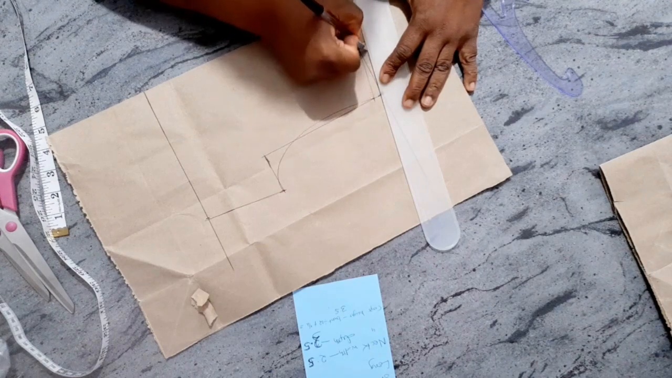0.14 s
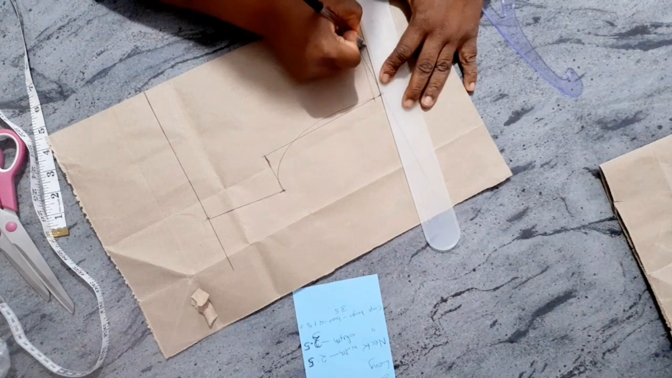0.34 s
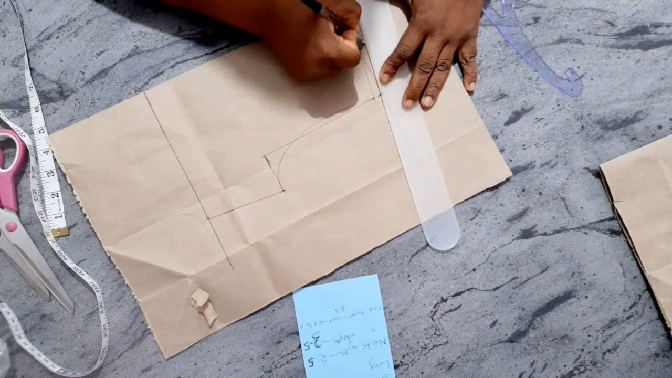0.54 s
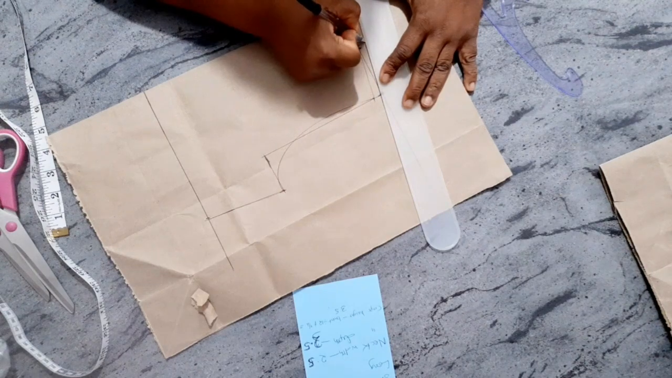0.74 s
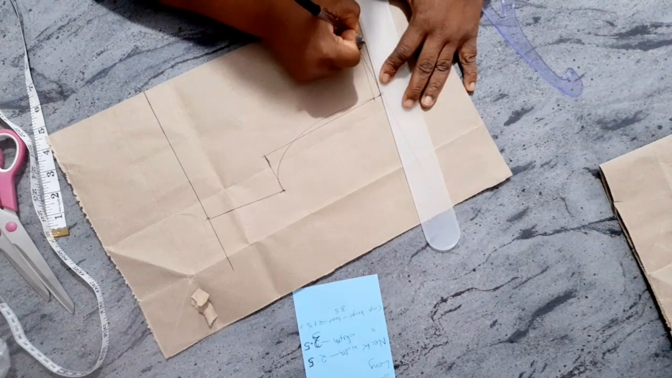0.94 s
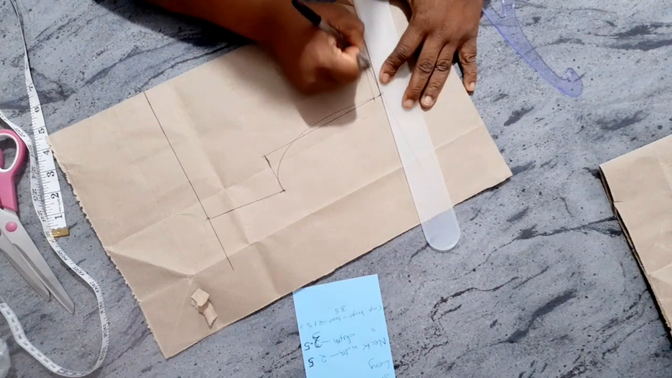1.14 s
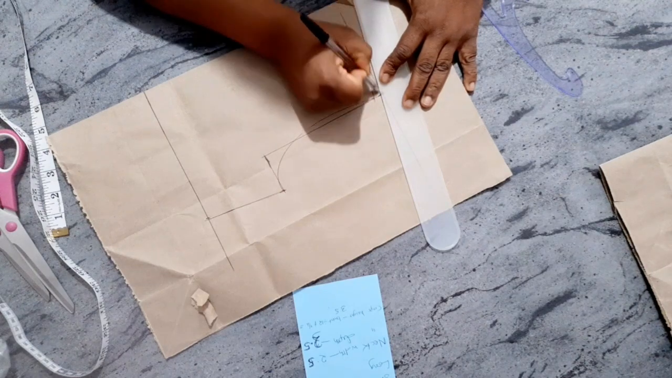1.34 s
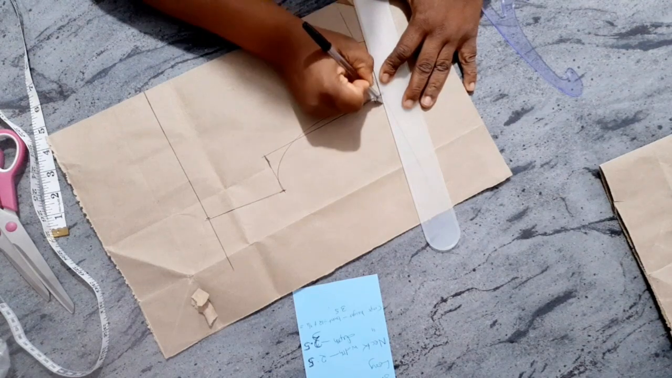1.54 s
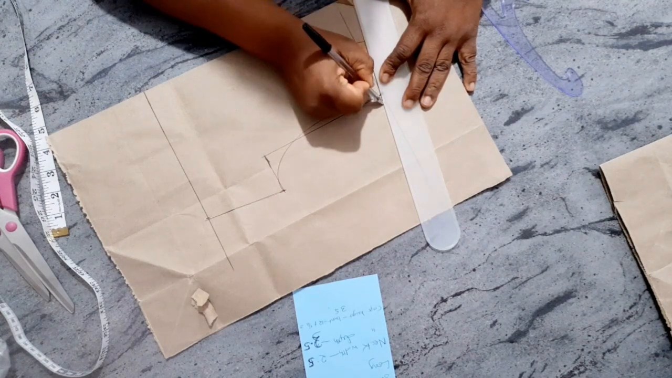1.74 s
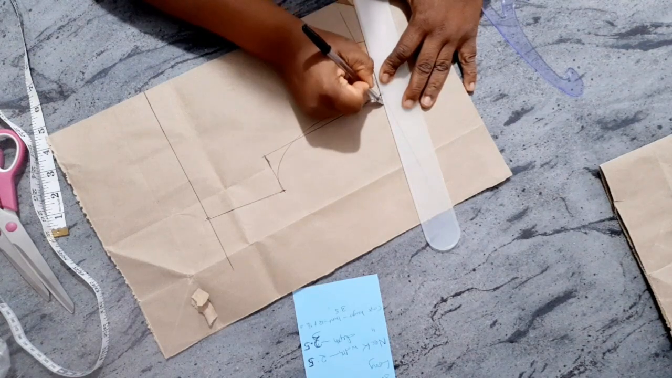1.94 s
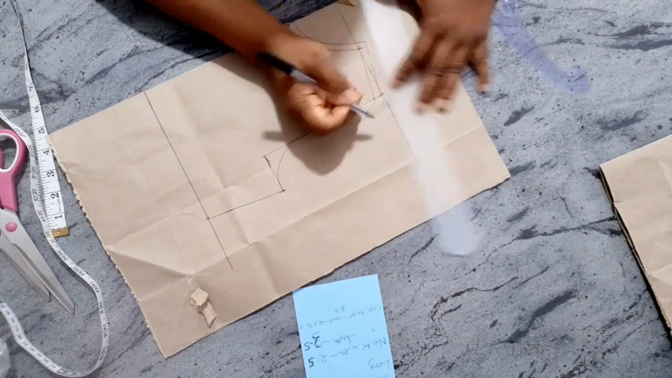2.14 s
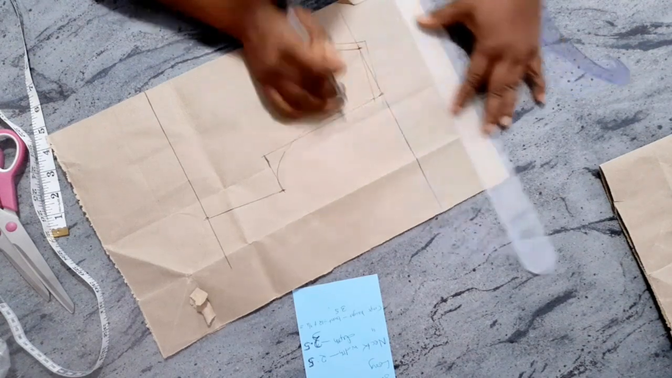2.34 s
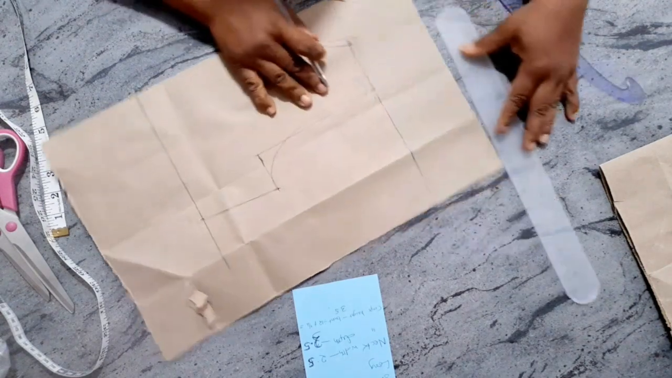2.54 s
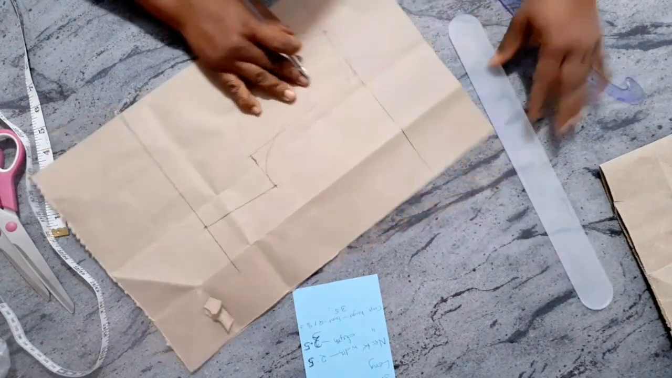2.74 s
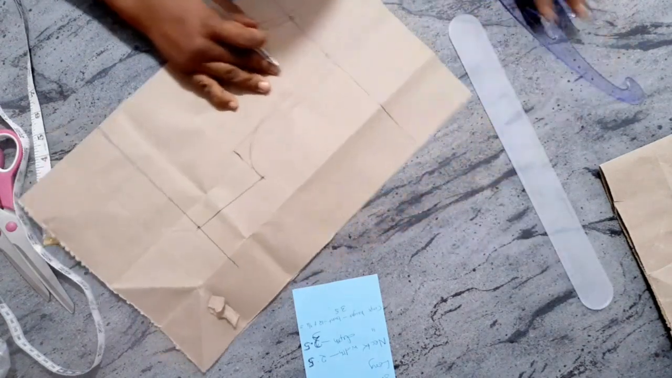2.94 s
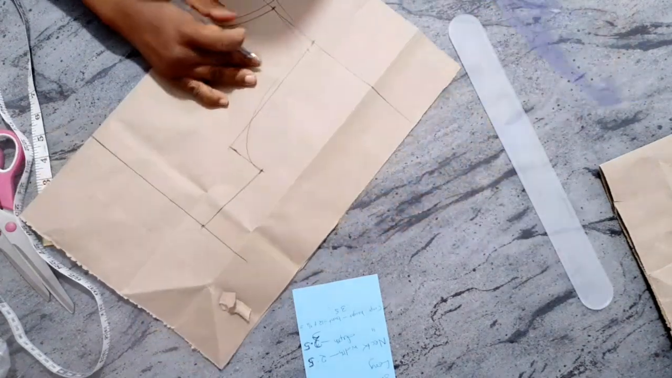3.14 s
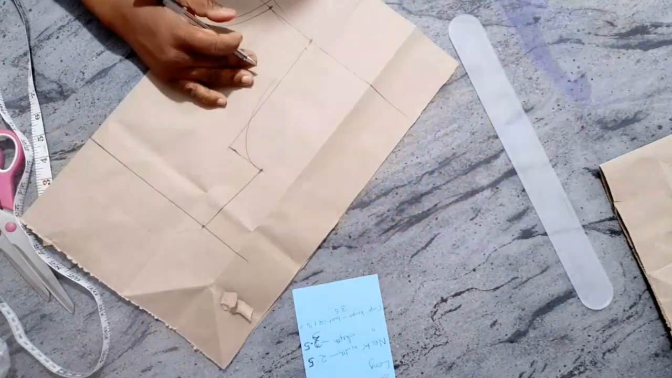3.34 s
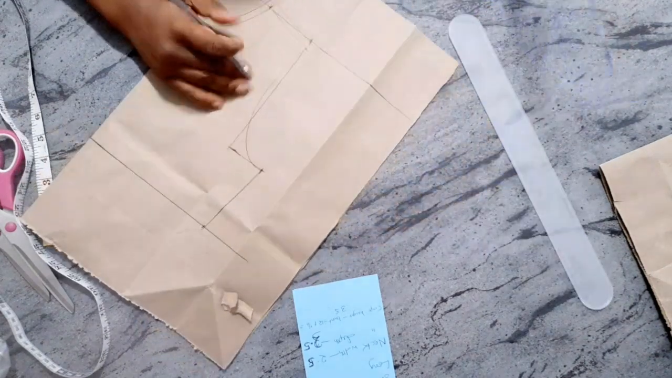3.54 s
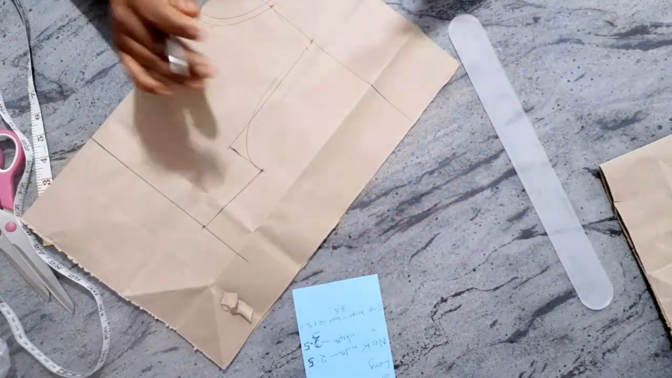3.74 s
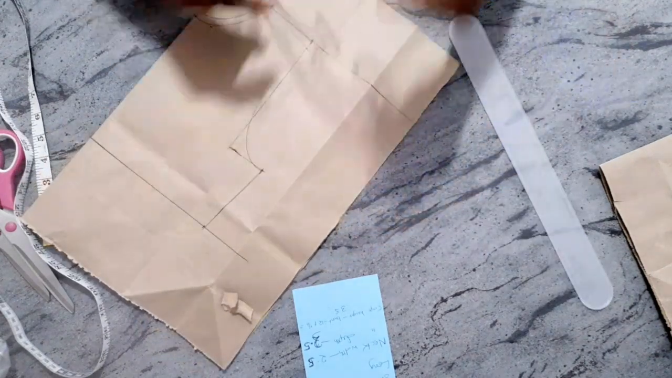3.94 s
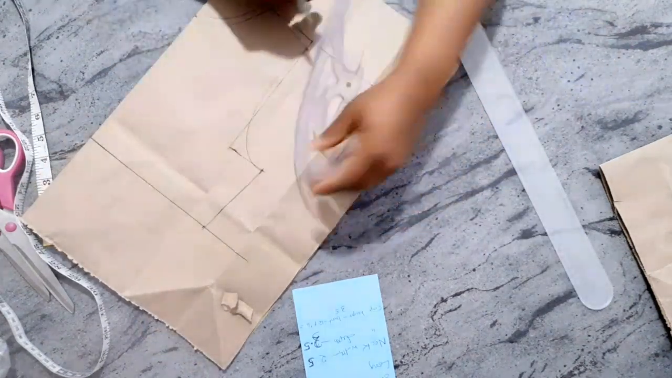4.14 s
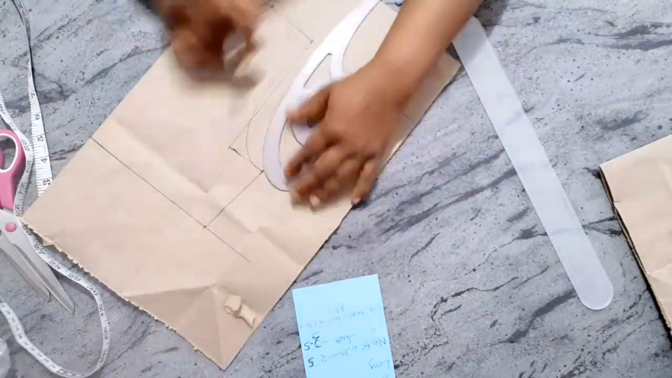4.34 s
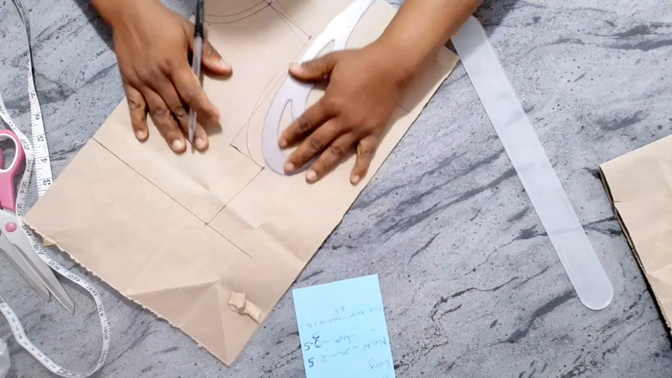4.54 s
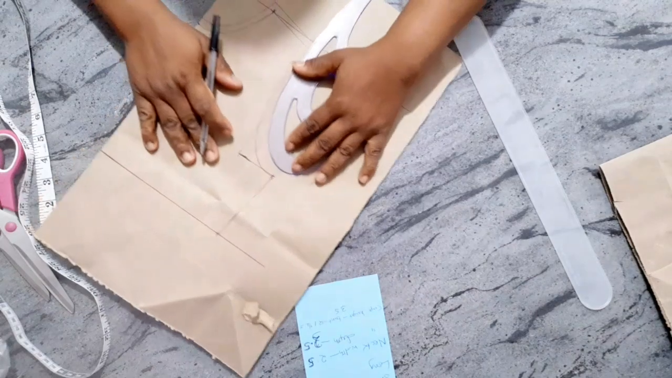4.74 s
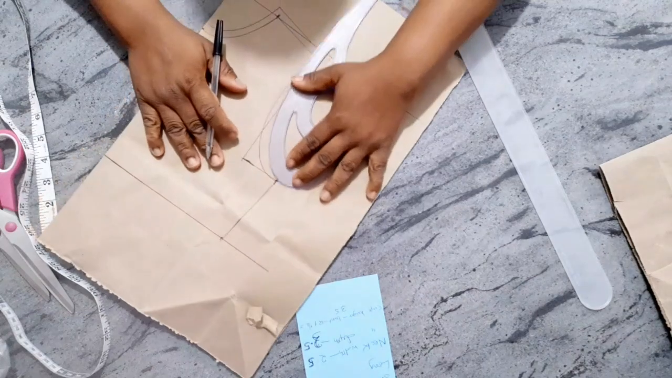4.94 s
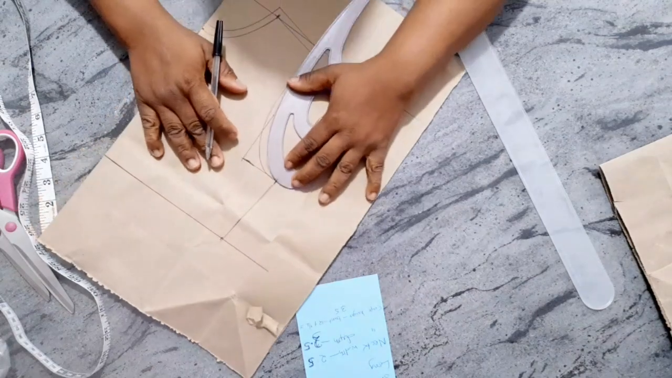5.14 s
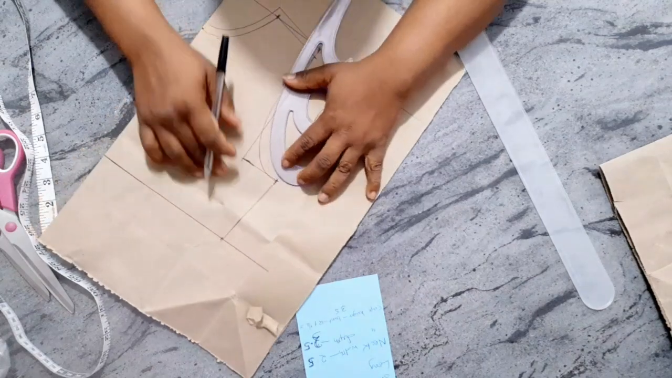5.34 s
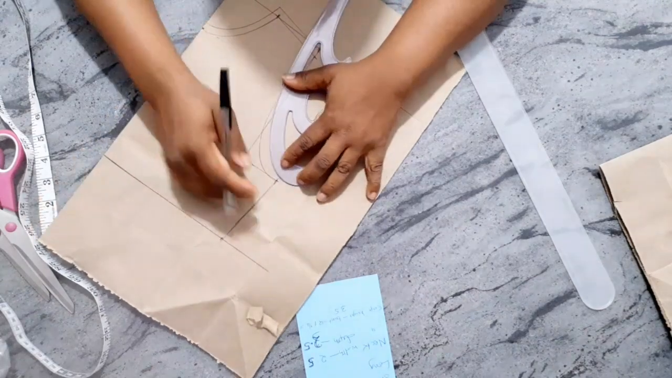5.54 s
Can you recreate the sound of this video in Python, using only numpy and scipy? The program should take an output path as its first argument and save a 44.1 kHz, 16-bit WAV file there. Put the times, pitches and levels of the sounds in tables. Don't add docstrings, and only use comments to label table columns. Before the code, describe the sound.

A quiet small hard room with faint low hum and hiss, heard closely in stereo. From 0 to 2 s there is almost nothing: faint pen scratching on paper, tiny hand rubs, and from about 1.0 to 1.5 s soft low groaning judders of the table near 370 Hz. At 2.1 s a small tick, then a plastic ruler slides, knocking at 2.4 and 2.5 s, with a paper snap at 2.25 s. Paper sweeps over stone in a dry, bright rasp from 2.5 to 3.1 s, settling in small rustles until 3.4 s. Faint plastic scrapes and taps come at 3.45 to 3.7 s and 4.0 s. At 4.15 s a thin plastic curve lands very loudly, rocks, and slaps flat at 4.27 s with bright, short rattling. Pressing clicks follow at 4.5 s, a paper shift at 4.6 to 4.8 s, soft palm rubs, and a dull pen tap at 5.4 s.

```python
import sys
import numpy as np
from scipy import signal
from scipy.fft import rfft, irfft
from scipy.io import wavfile
from scipy.ndimage import uniform_filter1d

SR = 44100
rng = np.random.default_rng(int(sys.argv[2]) if len(sys.argv) > 2 else 0)


def log_audio(samples):
    frames = np.atleast_2d(samples).T
    limited = np.clip(frames, -1, 1)
    pcm = np.round(limited * 32767).astype(np.int16)
    wavfile.write(sys.argv[1], SR, pcm)


def invert_db(x):
    u = np.asarray(x, float) / 20
    return 10 ** u


N = 246078
T = np.arange(N) / SR

# (frequency [Hz], density [dB per Hz])
AIR = [(15, -57), (25, -24), (68, -21.5), (92, -1), (167, -5.5), (399, -5.5), (445, -8.5), (1120, -19),
       (1550, -62), (2330, -35.5), (3150, -31.5), (3810, -26), (9580, -46), (13600, -19.5), (16500, -28)]
# (frequency [Hz], level [dB])
HUM = [(101, -75.5)]
# (centre [Hz], reverberation time [s], level [dB])
ROOM = [(230, 0.86, -2), (994, 0.43, -4), (2630, 0.38, -7), (5140, 0.32, -9), (10000, 0.23, -8)]
# (frequency [Hz], density [dB per Hz])
SHEET = [(1470, -5), (2300, -8.5), (2950, -2), (3190, 0.5), (6050, -2.5), (8170, -2.5), (9270, -10.5),
         (11800, -4), (15800, -10), (16150, -38), (16500, -54.5)]

# (frequency [Hz], width [Hz], level [dB])
TABLE = [(370, 170, -7), (830, 3.1, 1), (934, 58, -7)]
HELD_MODES = [(1150, 15, 2.5), (1752, 17, 2), (2476, 47, -2), (2930, 120, -4), (3800, 50, 2),
              (4510, 40, 2.5), (6760, 47, -4), (7900, 48, -17)]
TAPPED_MODES = [(1040, 150, -12.5), (1480, 55, 4), (2300, 230, -2), (3660, 140, -5), (4700, 190, -5.5),
                (6450, 100, -16)]
LANDING_MODES = [(853, 30, 0), (1190, 17, 1.5), (1870, 97, -0.5), (2610, 47, -5), (3270, 49, 3.5),
                 (4180, 35, -7.5), (4410, 75, -16), (4580, 90, -3), (5600, 73, -7), (6190, 30, -2),
                 (6360, 39, 2), (6770, 35, 5), (8300, 30, 3.5), (8690, 30, -5), (9900, 49, -4.5),
                 (11020, 34, -4.5), (11200, 39, 4), (11900, 39, -3), (12500, 51, -1.5), (13700, 61, 2.5),
                 (14500, 110, -9)]
FLAT_MODES = [(2260, 36, 4), (2420, 54, -6), (2618, 34, 4), (2900, 27, 3.5), (3280, 36, -4), (3860, 38, 3),
              (4850, 40, -15), (6550, 46, -2), (7660, 34, 8), (8300, 76, -7), (10030, 60, -8),
              (10840, 33, -4.5), (12000, 100, -15.5), (13200, 61, -3.5)]
SETTLING_MODES = [(2260, 60, -9.5), (2950, 40, 2), (3800, 82, 2), (5070, 38, -6), (5400, 58, -6),
                  (6340, 59, -5), (7360, 25, 1), (7600, 54, -8.5), (8800, 230, -19.5), (9940, 56, -16.5),
                  (13200, 43, -13), (13700, 36, -7.5)]
PRESSED_MODES = [(1440, 50, 7.5), (1800, 160, 2.5), (2440, 130, 4), (2800, 42, -10), (4000, 93, -30),
                 (6060, 40, -13.5), (7600, 33, -16), (7800, 180, -6)]
BARREL_MODES = [(1050, 24, 5), (2130, 28, 0), (2450, 110, 2), (2770, 100, 1), (3300, 25, 1),
                (4080, 210, -13), (4930, 110, -24), (5570, 60, -7)]
NIB_MODES = [(2640, 230, -4), (3800, 110, -2)]
RULER_MODES = [(1114, 11, 9), (1770, 36, -7), (2280, 27, -12.5), (2500, 58, 6.5), (2620, 33, -9.5),
               (2600, 32, 4)]
TAUT_MODES = [(4500, 1400, 2), (7800, 900, -1.5)]
CURVE_MODES = [(1170, 22, 0), (1820, 21, -2)]
BRUSH_MODES = [(6000, 1480, -8.5), (7760, 1500, 5)]

# (time [s], peak [dB], ring [Hz], edge [dB], thud [dB], contact [ms])
KNOCKS = [(2.0935, -51, 3300, -7, -14, 15), (2.3695, -23, 2500, -11, -14.5, 3.5),
          (2.5242, -28.5, 1500, -20, -23, 2.7), (2.5475, -24.5, 1500, -23, -9, 4),
          (4.7, -40.5, 660, -26, -2.5, 36), (4.6165, -34, 1600, -20, -18, 2.5)]
SNAPS = [(2.2538, -16.5, 8540, -9, -33, 1.3), (3.386, -43.5, 4860, -30, -42, 4.4)]
LIFT = [(3.4476, -47, 3860, -14, -8, 20), (3.46, -36.5, 3800, -15, -22, 14),
        (3.474, -37.5, 3800, -14, -14, 10.6), (3.4984, -39.5, 2950, -8, -12, 5),
        (4.0105, -38, 6170, -6, -23, 8.1), (4.017, -29.5, 4330, -17.5, -22.5, 4.2)]
TAPS = [(3.6516, -31, 1590, -23, -23.5, 4.7), (3.6564, -34.5, 1460, -29.5, -39, 3.7),
        (3.7044, -37.5, 1520, -22.5, -5.5, 2.4)]
LANDS = [(4.1538, -15, 5140, 2.5, -31, 20), (4.1657, -9.5, 4560, -1, -39, 9.5)]
ROCKS = [(4.2196, -11.5, 3400, -30, -24, 3.4), (4.2483, -18.5, 1480, -33.5, -25, 1.3)]
CLATTER = [(4.2713, -8.5, 2260, 0.93, -27.5, 7.1)]
PRESSES = [(4.5112, -30.5, 1330, -32, -15.5, 11), (4.5314, -24, 2440, -14, -23, 8),
           (4.5515, -21.5, 2760, -12, -32, 4.1), (4.5668, -37, 3400, -16, -6, 1.9)]
PEN_TOUCH = [(5.4012, -17, 2820, -39, -21.5, 3.7)]
# (time [s], peak [dB], ring [Hz], fade [ms], left-right [dB])
CLICKS = [(2.092, -31, 3200, 1.3, -3), (2.0926, -34, 4900, .8, 0), (3.6515, -34, 2300, 0.99, 4),
          (3.6518, -32, 4700, 1.0, 1), (3.6575, -35, 3700, 2.3, -5), (3.6672, -37, 1500, 1.5, -2),
          (4.0112, -44, 6400, 2.0, 0), (4.0172, -36, 4300, 2.0, 0), (4.022, -33, 3300, .8, -3),
          (4.046, -42, 4400, 3.0, 0), (4.034, -44, 4300, 4.0, 3), (4.1537, -11, 13300, 1.2, 1),
          (4.157, -16.5, 11200, 1.0, -1), (4.1658, -3, 13200, 0.81, 3), (4.1658, -6, 6800, .7, -1),
          (4.175, -8, 6900, 1.2, 1), (4.2025, -21, 1500, 3.1, 1), (4.2116, -24, 1300, 2.4, 0),
          (4.2275, -20, 3600, 1.0, -2), (4.2545, -23, 1700, 0.93, 3), (4.26, -25, 1700, 1.0, 2.5),
          (4.2638, -22.5, 1800, 1.1, -5), (4.2712, -2, 13000, 0.94, 3), (4.281, -18, 13200, 1.2, 0),
          (4.5072, -40, 1900, 2.0, 1), (4.5128, -29, 1510, 2.5, -2), (4.5311, -20, 1700, 1.0, -1),
          (4.533, -21, 2600, 1.3, 2.5), (4.541, -24, 2500, 1.2, 2), (4.546, -25, 2300, 1.0, 2),
          (4.5525, -21, 2900, 2.0, -9), (4.559, -33, 1600, 1.4, 0), (4.568, -23, 3500, 1.2, 2),
          (5.4037, -26, 2680, 1.1, 10), (2.5245, -29, 2200, .8, -2)]
# (time of peak [s], peak [dB], frequency [Hz], length [ms])
SHOVES = [(.009, -52.5, 350, 16), (.132, -52, 211, 17), (.266, -54.5, 288, 32), (.338, -53, 233, 14),
          (0.406, -54.5, 249, 15), (1.022, -49, 370, 10), (1.041, -45, 364, 16), (1.059, -50, 367, 11),
          (1.089, -41.5, 415, 16), (1.117, -36.5, 375, 17), (1.15, -34, 388, 11), (1.196, -31, 372, 25),
          (1.218, -36, 383, 8), (1.233, -30.5, 374, 9.1), (1.258, -34.5, 387, 19), (1.311, -38, 363, 12),
          (1.342, -39, 362, 12), (1.402, -36.5, 328, 13), (2.388, -36, 394, 7.3), (2.42, -36.5, 335, 29),
          (2.469, -36, 336, 30), (2.53, -31, 386, 23), (2.574, -43, 380, 13), (2.631, -45, 374, 15),
          (2.666, -41.5, 396, 18), (2.686, -39, 372, 9), (5.203, -51.5, 345, 13), (5.149, -56, 314, 37),
          (5.256, -57, 260, 20), (5.299, -48, 268, 14), (5.331, -54, 260, 18), (5.414, -51, 395, 19),
          (2.505, -41, 375, 22), (2.553, -39, 376, 15), (2.6, -47, 380, 16), (1.085, -46.5, 130, 50),
          (1.265, -45, 129, 48), (1.342, -39, 129, 38), (3.044, -43, 143, 52)]

# (time [s], hold [s], level [dB], drift over the hold [dB])
FIDGETS = [(0.0, 0.073, -66.5, -6), (.14, 0.034, -71, -7), (.56, 0.018, -81, 1), (.63, 0.059, -81, -7),
           (1.85, .04, -76.5, 2), (1.94, .03, -70.5, -7), (2.03, 0.04, -70, 0)]
FINGERTIPS = [(.9, 0.06, -84, -2), (1.07, 0.11, -64.5, 0), (1.29, 0.064, -69, 0), (3.68, 0.039, -70, -1),
              (3.94, 0.055, -73, -1), (5.28, 0.021, -64.5, 0)]
PALM = [(1.13, 0.1, -71.5, 12), (1.28, 0.21, -56.5, -11), (3.75, 0.13, -66, -5.5), (4.92, 0.067, -58.5, 1),
        (5.22, 0.22, -67.5, 11.5), (5.46, 0.14, -54, -1.5)]
RULER_FLAT = [(2.165, 0.13, -42, 3), (3.56, 0.022, -56.5, 0.5), (4.062, 0.015, -60, -3)]
RULER_EDGE = [(2.37, 0.1, -39.5, 1.5), (2.49, 0.077, -38.5, -8), (4.4, 0.17, -54, 3.5)]
SKIDS = [(2.096, .035, -63, -1), (4.012, 0.052, -60, -3), (4.534, .034, -41.5, -1.5),
         (4.19, 0.068, -32.5, -8), (4.3, 0.096, -38, -8.5)]
SHEET_TURNS = [(2.58, 0.36, -39, -1.5), (3.0, 0.019, -42.5, 1.5), (3.05, 0.07, -48.5, -5),
               (4.63, 0.06, -50, 3), (4.72, 0.084, -42.5, -3), (4.83, 0.042, -54, -2)]
SHEET_SETTLES = [(3.05, 0.077, -50, 3.5), (3.17, 0.055, -58.5, 4.5), (3.23, 0.043, -52, -2.5),
                 (3.33, 0.053, -58.5, -2)]
PUSHES = [(1.02, 0.1, -54, 15)]
LEANS = [(0.0, 0.079, -51.5, -4), (.12, 0.15, -70.5, 14), (1.19, 0.13, -39, 3), (1.4, 0.06, -42.5, -5),
         (1.5, 0.14, -54, -3)]
DRAGS = [(2.42, 0.058, -35.5, -2), (2.53, 0.2, -37.5, -5.5), (5.21, 0.16, -63, 8)]
JOLTS = [(1.65, 0.48, -67, 1.5), (2.12, 0.21, -53.5, 2.5), (2.72, 0.26, -54.5, 6), (3.11, 0.18, -53.5, -1),
         (3.5, 0.11, -64, 2), (4.05, 0.024, -61.5, -3), (4.19, 0.065, -41.5, -3), (4.54, 0.024, -39, -8),
         (4.71, 0.078, -47.5, -8.5), (5.0, 0.0365, -62.5, -13), (5.41, 0.079, -51, -5.5)]
THUMPS = [(.1, 0.089, -70.5, 0.26), (1.09, .03, -53, 0.4), (1.27, 0.11, -51.5, 2), (1.48, 0.1, -56, -3),
          (2.6, 0.1, -54.5, 0), (3.02, 0.092, -54.5, 0.22), (4.3, 0.038, -55.5, 0.25),
          (5.5, 0.071, -60.5, 0.41)]
PEN_LINES = [(.15, 0.11, -72.5, 0), (.47, 0.28, -75, 0), (.72, 0.36, -70, 0), (1.55, 0.47, -73.5, 0)]
BUZZ_LANDED = [(4.18, 0.061, -26, -6.5)]
BUZZ_FLAT = [(4.295, 0.12, -28.5, -14)]
RULER_SINGS = [(2.375, 0.12, -35, 0)]
SHEET_SINGS = [(2.66, .09, -36.5, 0), (2.8, 0.17, -35.5, 0)]
CURVE_SINGS = [(3.47, 0.074, -56, -7)]
BRUSHES = [(.628, 0.06, -67.5, 0), (.9, .07, -65, -2.2)]

# (movements, (bright grit [dB], dull drag [dB], ruler ring [dB]), (start [dB/s], stop [dB/s]))
CONTACTS = [(FIDGETS, (0, -4, -9), (1000, 160)), (FINGERTIPS, (3.7, -23, -21), (600, 700)),
            (PALM, (0.24, -5.5, -7.5), (120, 146)), (RULER_FLAT, (3.4, -20.5, -5.5), (380, 143)),
            (RULER_EDGE, (0, -5, -4), (160, 370)), (SKIDS, (-1.8, -5.5, -7), (1500, 470)),
            (SHEET_TURNS, (-1.8, -8, -10.5), (78, 250)), (SHEET_SETTLES, (-0.96, -0.71, -13), (410, 204))]
# (body [dB], bright [dB], dull [dB], ruler [dB])
RESTING_DB = (-76.5, -76.5, -83.5, -81.5)
# (movements, (deep share [dB], upper share [dB]), (start [dB/s], stop [dB/s]))
LOADS = [(PUSHES, (-20, -14), (260, 160)), (LEANS, (-5, -4.5), (170, 250)), (DRAGS, (-32, -0.15),
         (150, 190)), (JOLTS, (-2.9, 6.4), (890, 64)), (THUMPS, (6, 0), (210, 280))]
# (main [dB], deep [dB], upper [dB])
STILL_DB = (-84, -69, -63.5)


def unit(x):
    return x / np.sqrt(np.mean(x ** 2))


def band(x, lo_hz, hi_hz, order=2):
    sos = signal.butter(order, [lo_hz, min(hi_hz, .45 * SR)], "bandpass", fs=SR, output="sos")
    return signal.sosfilt(sos, x)


def ring(x, hz, width):
    return signal.lfilter(*signal.iirpeak(hz, hz / width, fs=SR), x)


def colour(x, points):
    hz, db = np.transpose(points)
    f = np.fft.rfftfreq(N, 1 / SR) + 1
    gain = invert_db(np.interp(np.log(f), np.log(hz), db, left=-90, right=-90))
    return unit(irfft(rfft(x) * gain, N))


def walk(rate):
    k = int(SR / rate)
    held = np.repeat(rng.standard_normal(N // k + 1), k)
    return unit(uniform_filter1d(uniform_filter1d(held, k), k)[:N])


def two_ports(alike_hz):
    mid, side = rng.standard_normal((2, N))
    treble = signal.lfilter(*signal.butter(2, alike_hz, "high", fs=SR), side)
    side = .24 * side + 0.84 * treble
    return np.array([mid + side, mid - side])


def moves(kinds, rest_db):
    t = T[::32]
    power = invert_db(np.array(rest_db))[:, None] ** 2 * np.ones(len(t))
    for rows, shares_db, (rise, fall) in kinds:
        effort = 0
        for s, hold, db, drift_db in rows:
            after = t - s
            level = db + drift_db * np.clip(after / hold, 0, 1)
            level = level + rise * np.minimum(after, 0) - fall * np.maximum(after - hold, 0)
            effort = effort + invert_db(level) ** 2
        power = power + invert_db(np.array([0, *shares_db]))[:, None] ** 2 * effort
    return np.array([np.interp(T, t, gain) for gain in np.sqrt(power)])


def air():
    hum = sum(invert_db(db + 4.5) * np.sin(2 * np.pi * np.cumsum(hz + 1.5 * walk(2.5)) / SR) for hz, db in HUM)
    drift = invert_db(.8 * walk(1.32))
    return drift * invert_db(-61.5) * colour(two_ports(alike_hz=990), AIR) + hum


def room(x):
    t, tail = T[:SR // 2], 0
    for hz, t60, db in ROOM:
        decay = np.exp(-np.log(1000) * t / t60)
        echoes = band(rng.standard_normal((2, len(t))), hz / 2.0, hz * 1.81) * decay
        tail = tail + invert_db(db) * echoes * np.sqrt(hz / np.sum(echoes ** 2) / SR * 4)
    tail = tail * np.clip(t / 0.00062, 0, 1)
    modes = rfft(tail, 2 * len(t))
    ceiling = 1.2 * uniform_filter1d(np.abs(modes), size=300)
    tail = irfft(modes * np.minimum(1, ceiling / (np.abs(modes) + 1e-12)))[:, :len(t)]
    gain = 1 / np.abs(rfft(tail[0])).mean()
    return signal.fftconvolve(x, gain * tail, axes=1)[:, :N]


def judder():
    shove = two_ports(alike_hz=1100) * invert_db(2.5 * walk(45))
    _, *upper_modes = TABLE
    upper = sum(invert_db(db) * ring(shove, hz, 1.38 * width) for hz, width, db in upper_modes)
    main = unit(ring(shove_main(shove), 363.0, 76) + invert_db(-13.0) * band(two_ports(alike_hz=1100), 192, 630))
    upper = unit(upper + invert_db(-3.0) * band(two_ports(alike_hz=940), 506.0, 1286, order=4))
    deep = unit(ring(shove, 123.0, 27) + invert_db(-2.5) * band(two_ports(alike_hz=1100), 52.9, 395))
    gains = moves(LOADS, STILL_DB)
    return invert_db(-5.0) * (gains[0] * main + gains[1] * deep + gains[2] * upper)


def shove_main(shove):
    hz, width, db = TABLE[0]
    return invert_db(db) * ring(shove, hz, 1.38 * width)


def shoves():
    out = np.zeros(N)
    for (s, db, hz, ms), turn in zip(SHOVES, rng.random(len(SHOVES))):
        i = max(int((s - .1) * SR), 0)
        after = T[i:int((s + .1) * SR)] - s
        swell = np.exp(-(after * 1000 / (0.57 * ms)) ** 2)
        out[i:i + len(after)] += invert_db(db) * swell * np.sin(2 * np.pi * (hz * after + turn))
    return invert_db(-1.5) * out


def pen():
    drag = two_ports(alike_hz=800) * invert_db(4.3 * walk(8.6))
    rung = unit(sum(invert_db(db) * ring(drag, hz, width) for hz, width, db in NIB_MODES))
    return moves([(PEN_LINES, (), (100, 60))], [-100]) * rung


def chatter(movements, modes, loss, rough_db=3.0):
    buzz = two_ports(alike_hz=2000) * invert_db(rough_db * walk(150))
    rung = unit(sum(invert_db(db) * ring(buzz, hz, width + loss * hz) for hz, width, db in modes))
    return moves([(movements, (), (1500, 350))], [-110]) * rung


def clicks():
    out, t = np.zeros((2, N)), T[:1024]
    lag = np.array([[0], [-np.pi / 4]])
    for s, db, hz, ms, pan_db in CLICKS:
        fade = np.exp(-t * 1000 / np.clip(ms, .2, 6)) * (1 - np.exp(-t * 1000 / .08))
        gain = invert_db(db + pan_db * np.array([[.5], [-.5]]))
        i = int(s * SR)
        out[:, i:i + len(t)] += gain * fade * np.sin(2 * np.pi * hz * t + lag)
    return invert_db(-1.5) * out


def strikes(table, modes, modes_db, width, tick, rise_ms=0.02, broad=0.4):
    length = 8192
    out, t = np.zeros((2, N + length)), T[:length]
    port_noise = rng.standard_normal((len(table), 2, length))
    common_noise = rng.standard_normal((len(table), length))
    for (s, db, hz, edge_db, thud_db, ms), own, shared in zip(table, port_noise, common_noise):
        fade = np.exp(-t / (np.clip(ms, .3, 40) / 1000)) + tick * np.exp(-t / 0.00029)
        scrape = (own + 0.99 * shared) * fade * (1 - np.exp(-1000 * t / rise_ms))
        body = ring(ring(scrape, hz, width * hz), hz, 5.6 * width * hz)
        body = body + broad * band(scrape, hz / 3.57, hz * 2.58, order=3)
        for f, mode_width, mode_db in modes:
            body = body + invert_db(mode_db + modes_db) * ring(scrape, f, mode_width + .004 * f)
        edge = band(scrape * np.exp(-t / 0.0087), 4900, 14540, order=3)
        thud = band(scrape, 214, 1110, order=3)
        body, edge, thud = (part / np.abs(part).max() for part in (body, edge, thud))
        i = int(s * SR)
        out[:, i:i + length] += invert_db(db) * (body + invert_db(edge_db) * edge + invert_db(thud_db) * thud)
    return out[:, :N]


def impacts():
    rocking_modes = [m for m in LANDING_MODES if m[0] < 7500]
    hits = invert_db(8.5) * strikes(KNOCKS, [], modes_db=0, width=0.26, tick=1.5)
    hits += invert_db(6.0) * strikes(SNAPS, [], modes_db=0, width=0.15, tick=.05, rise_ms=0.45, broad=.04)
    hits += invert_db(3.0) * strikes(LIFT, HELD_MODES, modes_db=5.0, width=0.3, tick=.1, rise_ms=7.0)
    hits += invert_db(3.0) * strikes(TAPS, TAPPED_MODES, modes_db=4.5, width=0.23, tick=0.57, broad=0.26)
    hits += invert_db(8.0) * strikes(LANDS, LANDING_MODES, modes_db=3.5, width=0.26, tick=0.35, broad=0.36)
    hits += invert_db(7.5) * strikes(ROCKS, rocking_modes, modes_db=-21.0, width=1.0, tick=0.22, rise_ms=0.25, broad=.15)
    hits += invert_db(10.0) * strikes(CLATTER, FLAT_MODES, modes_db=12.0, width=0.09, tick=2.6)
    hits += invert_db(7.0) * strikes(PRESSES, PRESSED_MODES, modes_db=2.5, width=0.25, tick=0.3)
    hits += invert_db(5.5) * strikes(PEN_TOUCH, BARREL_MODES, modes_db=4.5, width=0.986, tick=.3, rise_ms=0.74)
    hits += clicks()
    hits += chatter(BUZZ_LANDED, LANDING_MODES, loss=.002)
    hits += chatter(BUZZ_FLAT, SETTLING_MODES, loss=.002)
    return hits


def slides():
    slips = invert_db(0.67 * walk(300) + .7 * walk(40))
    grit = [two_ports(alike_hz=730) for _ in range(4)]
    grit = [slips * (g + invert_db(-8.5) * room(g)) for g in grit]
    body = unit(band(colour(grit[0], SHEET), 1470, 5900, order=3)) * invert_db(.5 * walk(43))
    bright = unit(band(colour(grit[1], SHEET), 6270, 19000, order=3)) * invert_db(1.3 * walk(25.16))
    dull = unit(band(grit[2], 1167, 2370, order=3)) * invert_db(0.45 * walk(27))
    ruler = unit(band(grit[3], 2264, 2920, order=3)) * invert_db(0.25 * walk(22))
    gains = moves(CONTACTS, RESTING_DB)
    return invert_db(4.5) * (gains[0] * body + gains[1] * bright + invert_db(1.5) * gains[2] * dull + gains[3] * ruler)


def scene():
    hits = impacts()
    mix = hits + invert_db(-8.0) * room(hits)
    mix += air() + judder() + shoves() + pen() + slides()
    mix += chatter(RULER_SINGS, RULER_MODES, loss=.001)
    mix += chatter(SHEET_SINGS, TAUT_MODES, loss=.001, rough_db=1.0)
    mix += chatter(CURVE_SINGS, CURVE_MODES, loss=.001)
    mix += chatter(BRUSHES, BRUSH_MODES, loss=.001)
    return mix


def low_pass(x):
    return signal.sosfilt(signal.butter(12, 16710, fs=SR, output="sos"), x)


def record(dry):
    left = invert_db(-1.6) * np.roll(dry[0], 3)
    ports = np.clip(np.array([left, dry[1]]), -1, 1)
    ports = signal.sosfilt(signal.ellip(12, .2, 100, 16450, fs=SR, output="sos"), ports)
    mix = np.clip(ports, -1, 1)
    return low_pass(mix)


dry = scene()
out = record(dry)
log_audio(out)
```